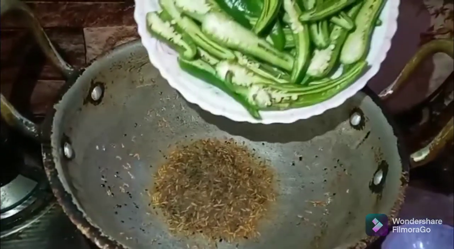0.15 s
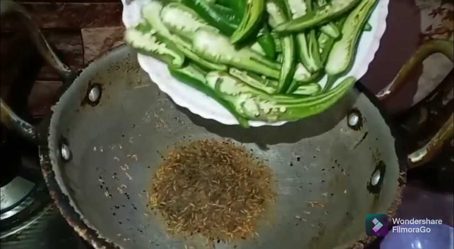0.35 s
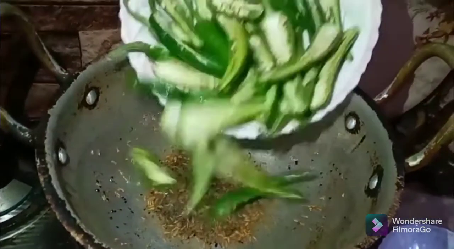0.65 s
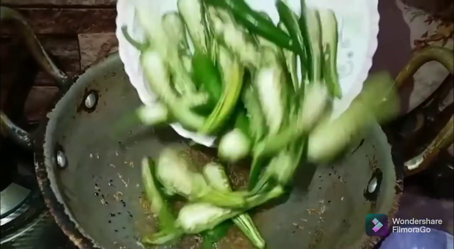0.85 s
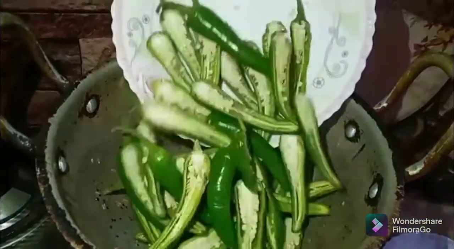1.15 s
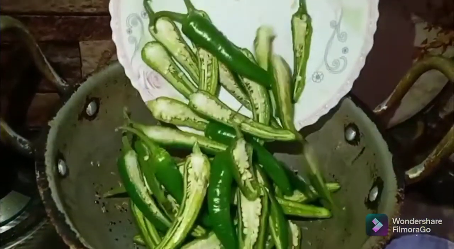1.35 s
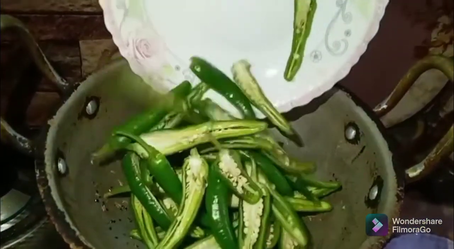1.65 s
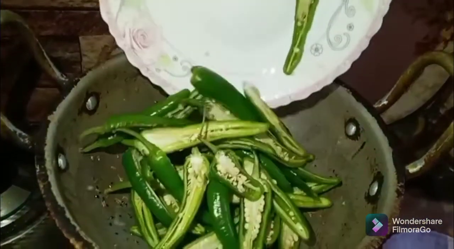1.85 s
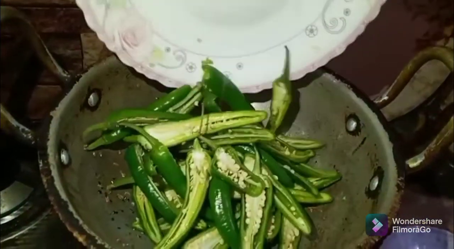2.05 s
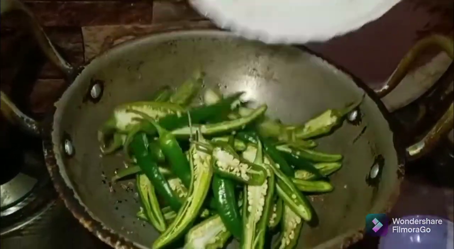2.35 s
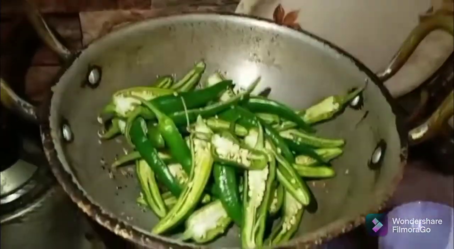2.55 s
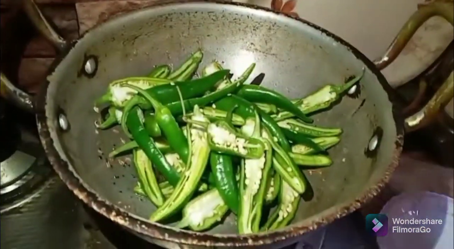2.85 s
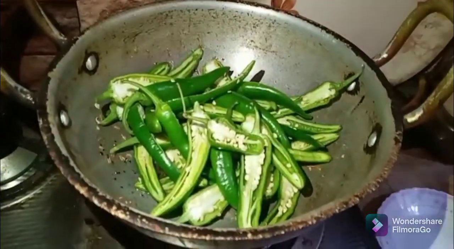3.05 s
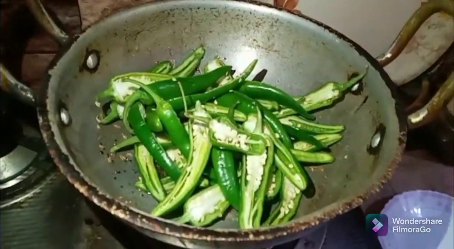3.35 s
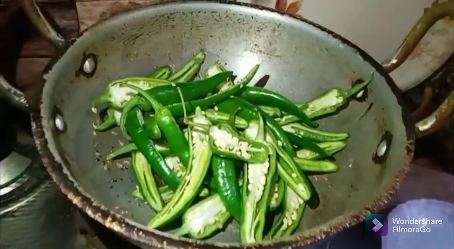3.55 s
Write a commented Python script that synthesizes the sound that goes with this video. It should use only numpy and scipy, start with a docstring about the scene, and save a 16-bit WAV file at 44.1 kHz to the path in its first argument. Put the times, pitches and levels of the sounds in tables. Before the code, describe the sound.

A close sizzle builds as slit chillies slide into a pan of hot oil, landing softly and spitting over a faint burner rumble. A dish is then put down on the kitchen counter with a brief ringing clatter.

```python
"""Chillies into hot oil

Slit green chillies slide off a plate into a metal pan: narrow noise bands of the plate, damped sines of the pan.
The faint fizz of the oil swells into a dense crackle of random clicks and hiss over a burner's noise rumble,
with pitched noise bursts for spits and soft slaps. Near the end a dish is put down beside the pan:
decaying sines clatter and ring in the small kitchen, with coloured noise for the counter."""
import sys
import numpy as np
from scipy import signal
from scipy.fft import rfft, irfft
from scipy.io import wavfile

SR = 44100
rng = np.random.default_rng(int(sys.argv[2]) if len(sys.argv) > 2 else 0)


def persist_wave(psi):
    """Save psi, clipped to +-1, as 16-bit WAV."""
    counts = np.round(np.clip(psi, -1, 1) * 32767).astype(np.int16)
    wavfile.write(sys.argv[1], SR, np.atleast_2d(counts).T)


N = 163170
TIME = np.arange(N) / SR


def from_db(db):
    """Decibels to gain."""
    return 10 ** (np.asarray(db) / 20)


def rms_one(x):
    """Scale to unit rms."""
    return x / np.sqrt(np.mean(x ** 2) + 1e-20)


def in_time(rows):
    """Each column of a curve at every sample."""
    s, *columns = np.transpose(rows)
    return [np.interp(TIME, s, c) for c in columns]


def at_hz(points, hz):
    """Read a spectrum on a log-frequency axis."""
    f, value = np.transpose(points)
    return np.interp(np.log(hz + 1), np.log(f), value)


def band(x, low_hz, high_hz):
    """Causal band-pass."""
    edges_hz = [low_hz, min(high_hz, SR / 2 - 1000)]
    sos = signal.butter(2, edges_hz, "band", fs=SR, output="sos")
    return signal.sosfilt(sos, x + 1e-18)


def stereo_noise():
    """Independent white noise in two channels."""
    return rng.standard_normal((2, N))


# Left-right likeness of noise. Each row: frequency in Hz, correlation from -1 to 1.
LIKENESS = [(100,0.98),(700,0.28),(3000,0.098)]


def coloured_noise(spectrum):
    """Stereo noise of a given colour, alike in both ears in the bass; rms 1."""
    hz = np.fft.rfftfreq(N, 1 / SR)
    mid, side = rfft(stereo_noise())
    alike = np.clip(at_hz(LIKENESS, hz), -1, 1)
    both = np.sqrt(1 + alike) * mid + np.sqrt(1 - alike) * side * [[1], [-1]]
    half_last_hz = spectrum[-1][0] / 2
    rolloff = 1 + (hz / half_last_hz) ** 4
    if ROLLOFF_AT_HALF:
        return rms_one(irfft(both * from_db(at_hz(spectrum, hz)) / rolloff, N))
    last_hz = spectrum[-1][0]
    rolloff = 1 + (hz / last_hz / 2) ** 4
    return rms_one(irfft(both * from_db(at_hz(spectrum, hz)) / rolloff, N))


ROLLOFF_AT_HALF = False


def wander(per_s):
    """Slow random modulation, 2.67 Hz up to per_s; rms 1."""
    return rms_one(band(rng.standard_normal(N), 2.67, per_s))


def scatter(decay_s, size):
    """Exponentially dying noise, different at each ear; unit energy."""
    h = rng.standard_normal((2, size)) * np.exp(-np.arange(size) / SR / decay_s)
    return h / np.sqrt(np.sum(h ** 2, axis=1, keepdims=True))


def through(x, response):
    """Pass a sound through a stereo response."""
    return signal.oaconvolve(np.atleast_2d(x), response, axes=1)[:, :N]


KITCHEN_T60_S = 0.17


def kitchen(x, wet_db):
    """Direct sound plus the short, diffuse tail of the room."""
    tail = scatter(KITCHEN_T60_S / np.log(1000), size=16000)
    return x + from_db(wet_db) * through(x, tail)


def burst(decay_s, low_hz, high_hz):
    """One brief band-limited burst, starting at about unit rms."""
    x = band(scatter(decay_s, size=4000), low_hz, high_hz)
    return x / np.sqrt(np.sum(x ** 2, axis=1, keepdims=True)) * np.sqrt(decay_s * SR / 2)


def pitched_burst(decay_s, hz, width):
    """A burst in a band around one pitch; width is a fraction of the pitch."""
    return burst(decay_s, hz / (1 + width), hz * (1 + width))


def add(out, s, x):
    """Mix a short sound in at a time."""
    i = int(s * SR)
    out[:, i:i + x.shape[1]] += x[:, :N - i]


LARGEST_CLICK = 3  # in multiples of the spread


def clicks(per_s, spread_db):
    """Random clicks of either sign, many small and a few large; rms 1."""
    born = np.flatnonzero(rng.random(N) < per_s / SR)
    size = np.minimum(rng.exponential(1, N)[born], LARGEST_CLICK)
    sign = np.sign(rng.random(N)[born] - .5)
    out = np.zeros(N)
    out[born] = from_db(spread_db * size) * sign
    return rms_one(out)


# Colour of the rumble. Each row: frequency in Hz, relative density in dB per Hz.
RUMBLE_COLOUR = [(30,-32),(48,-15),(65,-16.5),(92,6.5),(115,-9),(300,-25)]
# Burner level. Each row: time in seconds, rumble in dB before RUMBLE_TRIM_DB and flutter, boom in dB.
RUMBLE_LEVEL = [(0,-44.5,-45.5),(.3,-51.5,-59.5),(.5,-43.5,-64),(.75,-54,-68),(1.15,-47,-46),(1.75,-57,-65),(2.4,-57.5,-51.5),(3.15,-59,-63),(3.45,-45.5,-49.5),(3.7,-63.5,-66)]
# Colour of the fizz of the oil. Each row: frequency in Hz, relative density in dB per Hz.
FIZZ_COLOUR = [(200,-12.5),(400,-7),(540,-20.5),(850,-11.5),(4400,-16),(6600,-4),(9200,-22),(11300,-9.5),(14000,-19)]
RUMBLE_TRIM_DB, RUMBLE_FLUTTER_DB, RUMBLE_FLUTTER_HZ, BOOM_HZ = -1, 3.5, 12, 136.4
FIZZ_DB, FIZZ_FLICKER_DB, FIZZ_FLICKER_HZ = -50, 1.2, 23.5


def background():
    """The burner rumbles unevenly, with a boom a fifth higher, under the faint flickering fizz of the hot oil."""
    rumble_db, boom_db = in_time(RUMBLE_LEVEL)
    rumble_db = rumble_db + RUMBLE_TRIM_DB + RUMBLE_FLUTTER_DB * wander(RUMBLE_FLUTTER_HZ)
    rumble = from_db(rumble_db) * coloured_noise(RUMBLE_COLOUR)
    boom = from_db(boom_db) * rms_one(band(rng.standard_normal(N), BOOM_HZ - 10, BOOM_HZ + 10))
    fizz_db = FIZZ_DB + FIZZ_FLICKER_DB * wander(FIZZ_FLICKER_HZ)
    return rumble + boom + from_db(fizz_db) * coloured_noise(FIZZ_COLOUR)


# High modes of the plate. Each entry: frequency in Hz.
PLATE_HZ = [4080, 5400, 6100]
RUB_AT_S, RUB_DB, RUB_FADE_S = .24, -48.5, 0.059


def plate():
    """The shifting chillies rub a few narrow modes of the plate, which swell and fade."""
    modes = sum(band(stereo_noise(), hz - 20, hz + 20) for hz in PLATE_HZ)
    swell = np.exp(-abs(TIME - RUB_AT_S) / RUB_FADE_S)
    return from_db(RUB_DB) * swell * rms_one(modes)


# The dish touches down. Each row: start in seconds, level in dB, share on its base rather than its rim (0-1).
CLANKS = [(3.219,-14,0.02),(3.265,-25.5,0),(3.291,-16.5,0),(3.321,-20,0.05),(3.415,-12.5,0.95),(3.49,-26.5,0.86)]
# Modes of the dish. Each row: frequency in Hz, dB struck on the rim, dB struck on the base, t60 in seconds.
DISH_MODES = [(1230,-0.5,-6,0.054),(1357,-7,-7,0.053),(1530,-1,-10,0.052),(1864,-2.5,-10,0.042),(2334,0,-16,0.074),(2425,-19,10.5,0.076),(4075,0.5,-6,0.068),(6520,-4.5,-8,0.066),(7770,-16.5,-6,.05)]
# The dish slides over the counter. Each row: time in seconds, level in dB.
SLIDE = [(3.22,-28),(3.36,-29),(3.46,-28.5),(3.59,-32.5),(3.64,-57)]
# Colour of the counter's knock and scrape. Each row: frequency in Hz, relative density in dB per Hz.
COUNTER_COLOUR = [(60,-38),(240,-10),(550,-5),(900,0.5),(1300,6.5),(2200,1),(3300,-8),(7000,-46)]
KNOCK_DB, KNOCK_S, SLIDE_RING_DB = -11.5, 0.0057, -11
DISH_ROOM_DB, DISH_TAIL_S = -9, 0.24


def dish():
    """The dish rocks on its rim, drops on its base and slides to rest; each touch rings it and knocks the counter."""
    starts, levels_db, base = np.transpose(CLANKS)
    base = np.clip(base, 0, 1)
    slide = from_db(in_time(SLIDE)[0]) * (TIME > starts[0])

    rings = np.zeros((2, N))
    t = TIME[:SR // 2]
    for hz, rim_db, base_db, t60_s in DISH_MODES:
        struck_db = levels_db + rim_db + base * (base_db - rim_db)
        for start, db in zip(starts, struck_db):
            tone = np.sin(2 * np.pi * (hz * t + rng.random((2, 1))))
            add(rings, start, from_db(db - 60 * t / t60_s) * tone)
    base_hz = max(DISH_MODES, key=lambda mode: mode[2])[0]  # sliding keeps the strongest base mode singing
    singing = rms_one(band(stereo_noise(), base_hz - 10, base_hz + 10))
    rings += from_db(SLIDE_RING_DB) * slide * singing

    knock_power = 0
    for start, db in zip(starts, levels_db):
        dying = np.exp(-np.maximum(TIME - start, 0) / KNOCK_S) * (TIME >= start)
        knock_power = knock_power + (from_db(db + KNOCK_DB) * dying) ** 2
    counter = np.sqrt(knock_power + slide ** 2) * coloured_noise(COUNTER_COLOUR)
    tail = through(rings, scatter(DISH_TAIL_S, size=24000))
    return rings + from_db(DISH_ROOM_DB) * tail + counter


# Loads hit the pan. Each row: start in seconds, level in dB, pitch in Hz.
THUDS = [(.47,-39,874),(.752,-37.5,378),(0.781,-30.5,387),(.81,-39,803)]
THUD_S, THUD_ATTACK_S = .028, 0.0018


def thuds():
    """The falling heap sets a low, damped ring going in the pan."""
    out, t = np.zeros((2, N)), TIME[:SR // 2]
    envelope = (1 - np.exp(-t / THUD_ATTACK_S)) * np.exp(-t / THUD_S)
    for s, db, hz in THUDS:
        ring = envelope * np.sin(2 * np.pi * hz * t)
        add(out, s, from_db(db) * ring[None])
    return out


# Chillies land and tumble. Each row: start in seconds, level in dB before SLAP_TRIM_DB, pitch in Hz.
SLAPS = [(.825,-20,2100),(1.084,-18,2350),(1.24,-14,2085),(1.345,-25.5,1420),(1.537,-23,2930),(1.575,-19.5,950),(1.586,-18,2400),(1.962,-17,3130),(1.999,-20,3570),(2.077,-18,2600),(2.457,-14,2530),(3.64,-16.5,2440)]
SLAP_TRIM_DB, SLAP_S, SLAP_WIDTH, SPLASH_DB = -1, 0.0041, 0.14, -2.5


def slaps():
    """Each hollow chilli lands with a short pitched pop and a wet splash."""
    out = np.zeros((2, N))
    for s, db, hz in SLAPS:
        pop = pitched_burst(SLAP_S, hz, SLAP_WIDTH)
        splash = band(burst(SLAP_S, 800, 4100), 880, 7200)
        add(out, s, from_db(db + SLAP_TRIM_DB) * (pop + from_db(SPLASH_DB) * splash))
    return out


# Bright snaps as wet skins first touch the oil. Each row: start in seconds, level in dB before SNAP_TRIM_DB.
SNAPS = [(.416,-27.5),(.472,-24),(.506,-20.5),(0.6425,-20.5),(0.7672,-20),(.788,-20),(1.054,-19),(1.1167,-20.5)]
SNAP_TRIM_DB, SNAP_S, SNAP_TOP_DB = -5, 0.0047, -4.5


def snaps():
    """Wet skins snap in two broad overlapping bands of noise."""
    out = np.zeros((2, N))
    for s, db in SNAPS:
        body = burst(SNAP_S, 4100, 6900)
        top = burst(SNAP_S, 4700, 11000)
        add(out, s, from_db(db + SNAP_TRIM_DB) * (body + from_db(SNAP_TOP_DB) * top))
    return out


# Water drops burst in the oil. Each row: start in seconds, level in dB before SPIT_TRIM_DB, pitch in Hz.
SPITS = [(0.7094,-13,4070),(1.1931,-12.5,5570),(1.33,-14.5,6560),(1.387,-15.5,6500),(1.426,-14,6180),(1.517,-8,5200),(1.598,-10,6140),(1.645,-12.5,6000),(1.669,-11.5,6100),(1.7034,-12.5,5650),(1.743,-13,3540),(1.798,-16,3760),(2.147,-12,3830),(2.241,-10.5,3450),(2.4155,-11,4470),(2.506,-11.5,4400),(2.737,-10.5,3140),(2.864,-11,6100),(3.508,-12.5,6600)]
SPIT_TRIM_DB, SPIT_S, SPIT_WIDTH = -0.5, 0.0015, 0.082
SPIT_PAN_DB = -1  # left minus right


def spits():
    """Larger drops burst with a pitched tick."""
    out = np.zeros((2, N))
    sides = from_db(np.array([[.5], [-.5]]) * SPIT_PAN_DB)
    for s, db, hz in SPITS:
        tick = pitched_burst(SPIT_S, hz, SPIT_WIDTH)
        add(out, s, from_db(db + SPIT_TRIM_DB) * sides * tick)
    return out


# Level of the sizzle, each column relative to its median.
# Each row: time in seconds, middle in dB, low crackle in dB, top fizz in dB.
SIZZLE_LEVEL = [(.5,-38.5,-49,-46),(.72,-34,-40.5,-41.5),(.95,-37,-44,-45),(1.15,-33,-36.5,-47.5),(1.5,-34,-39.5,-46.5),(2.1,-31,-38.5,-47),(2.9,-30,-35.5,-43),(3.7,-31.5,-36,-48)]
# Colour of the sizzle. Each row: frequency in Hz, relative density in dB per Hz.
SIZZLE_COLOUR = [(620,-34.5),(860,-6.5),(1150,-15.5),(2400,-3.5),(3600,-1),(5000,-4),(6400,1.5),(8800,-16.5),(11300,-10.5),(13400,-21.5),(15100,-11.5)]
# The sizzle dips briefly. Each entry: time in seconds.
LULLS = [.632, 1.292]
LULL_DB, LULL_S = -13, 0.0097
SIZZLE_DB, SIZZLE_ROOM_DB, SURGE_DB, SURGE_HZ = -30, -7.5, 2.5, 23.5
BUBBLES_PER_S, BUBBLE_SPREAD_DB, GRAIN_S = 80, 5, 0.001  # bubbles per band and frying spot
CRACKS_PER_S, CRACK_SPREAD_DB, CRACK_DB, CRACK_TOP_DB = 45, 5, -0.5, 3.5  # cracks per frying spot
# wet skins hiss more smoothly at first, and the extra hiss fades
HISS_DB, FRESH_HISS_DB, FRESH_HISS_S = -9, 4, 0.45


def sizzle():
    """Tiny steam bubbles ring at their own pitches, cracks span all pitches, and the smallest merge into a hiss."""
    together = wander(SURGE_HZ)
    levels = []
    for curve, depth in zip(in_time(SIZZLE_LEVEL), (.55, 1.3, .55)):
        surge = SURGE_DB * (.5 * together + depth * wander(SURGE_HZ))
        levels.append(curve - np.median(curve) + surge)
    middle, low, top = levels
    cracks = [clicks(CRACKS_PER_S, CRACK_SPREAD_DB) for spot in range(3)]  # three frying spots in the pan
    age = np.maximum(TIME - SIZZLE_LEVEL[0][0], 0)
    hiss_db = HISS_DB + FRESH_HISS_DB * np.exp(-age / FRESH_HISS_S)

    out, power = 0, 0
    edges_hz = np.geomspace(560, 17000, 21)
    for low_hz, high_hz in zip(edges_hz, edges_hz[1:]):
        hz = np.sqrt(low_hz * high_hz)
        to_low = np.interp(hz, [1800, 3300], [1, 0])
        to_top = np.interp(hz, [7000, 9500], [0, 1])
        crack_gain = from_db(CRACK_DB + CRACK_TOP_DB * to_top)
        pops = 0
        for spot in cracks:
            hits = clicks(BUBBLES_PER_S, BUBBLE_SPREAD_DB) + crack_gain * spot
            pops = pops + through(hits, scatter(GRAIN_S, size=400))
        pops = band(pops, low_hz, high_hz)
        pops = np.array([rms_one(ear) for ear in pops])
        hiss = rms_one(band(stereo_noise(), low_hz, high_hz))
        grains = rms_one(pops + from_db(hiss_db) * hiss)
        gain = from_db(at_hz(SIZZLE_COLOUR, hz)) * np.sqrt(high_hz - low_hz)
        level_db = middle + to_low * (low - middle) + to_top * (top - middle)
        out = out + gain * grains * from_db(level_db)
        power += gain ** 2

    first_contact = np.interp(TIME, [.44, .5], [0, 1])
    dry_sizzle = from_db(SIZZLE_DB) * first_contact * out / np.sqrt(power)
    lulls = from_db(LULL_DB * sum(np.exp(-((TIME - s) / LULL_S) ** 2) for s in LULLS))
    return lulls * kitchen(dry_sizzle, SIZZLE_ROOM_DB)


HIT_ROOM_DB = -7


def scene():
    """Chillies, pan, dish, plate and burner in the kitchen."""
    frying = sizzle()
    hits = kitchen(spits() + snaps() + slaps(), HIT_ROOM_DB)
    return frying + hits + thuds() + dish() + plate() + background()


# Left minus right at the microphone. Each row: frequency in Hz, difference in dB.
BALANCE = [(90,3.5),(770,1),(1800,5.5),(4200,5.5),(6400,11.5),(7800,10.5),(9500,-7.5),(15000,-4)]
PORT_LAG_S, CUTOFF_HZ = 0.001065, 15900


def record(dry):
    """Two microphone ports of unlike colour, the left a little late; peaks are rounded and the top is cut."""
    hz = np.fft.rfftfreq(2 * N, 1 / SR)
    half = np.array([[.5], [-.5]])  # left, right
    colour = from_db(at_hz(BALANCE, hz) * half)
    lag = np.exp(-2j * np.pi * hz * PORT_LAG_S * half)
    heard = irfft(rfft(dry, 2 * N) * colour * lag)[:, :N]
    top_cut = signal.ellip(10, .3, 70, CUTOFF_HZ, fs=SR, output="sos")
    return signal.sosfilt(top_cut, np.tanh(heard))


dry = scene()
out = record(dry)
persist_wave(out)
```